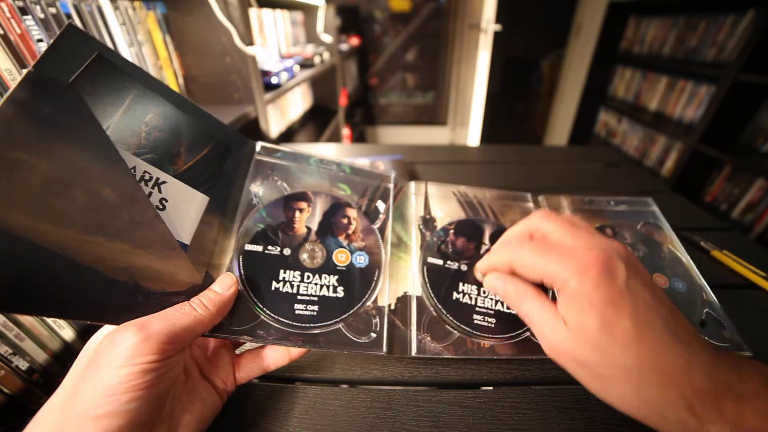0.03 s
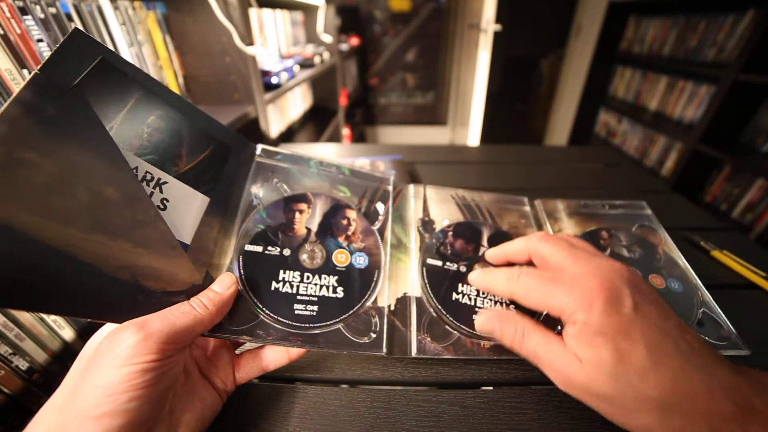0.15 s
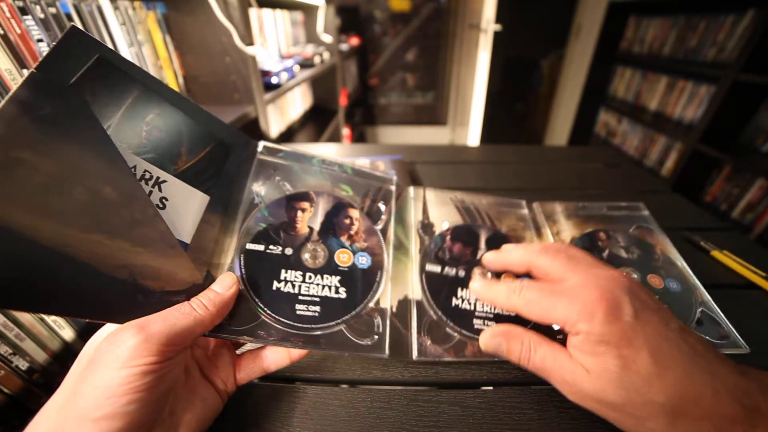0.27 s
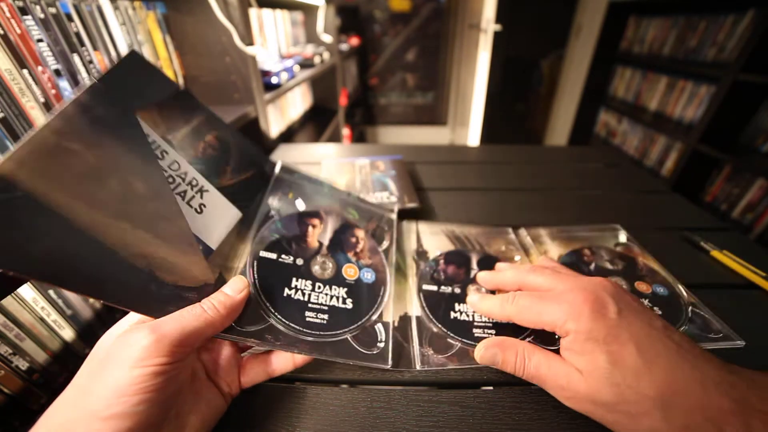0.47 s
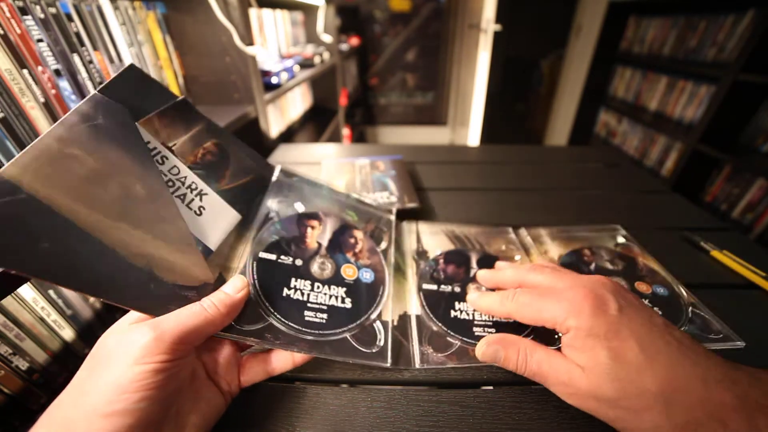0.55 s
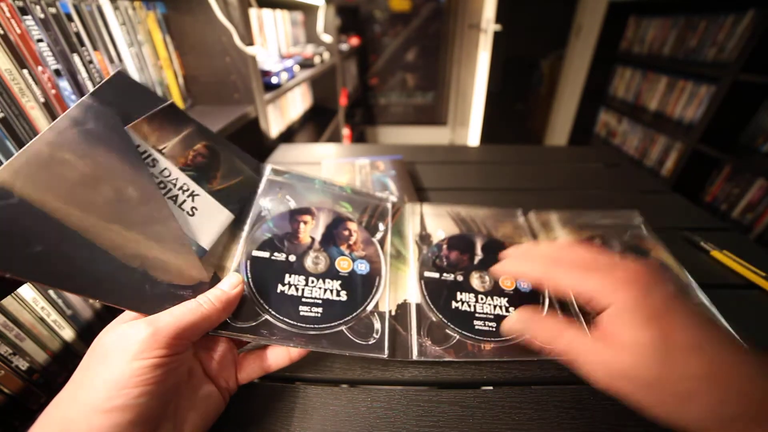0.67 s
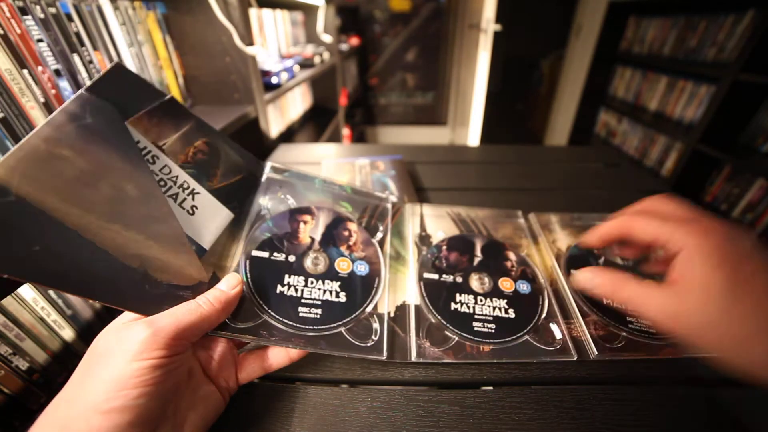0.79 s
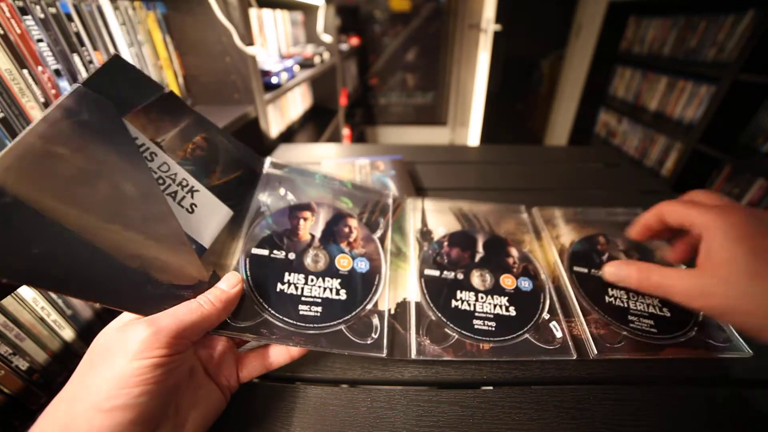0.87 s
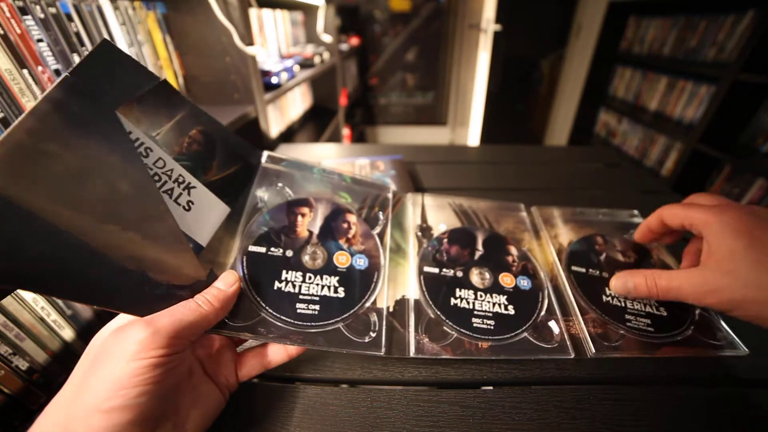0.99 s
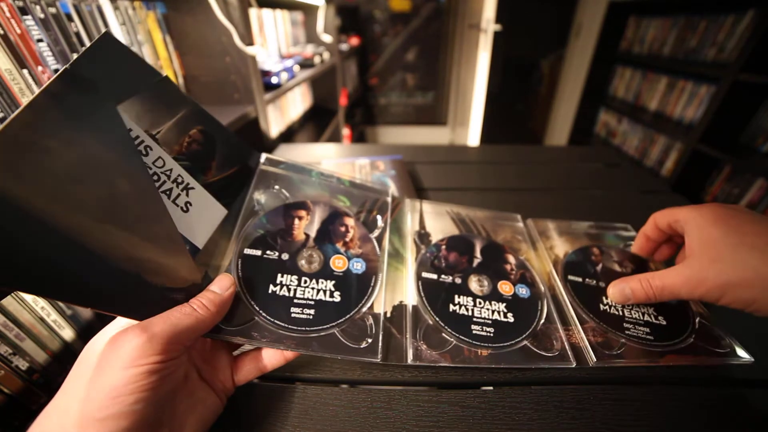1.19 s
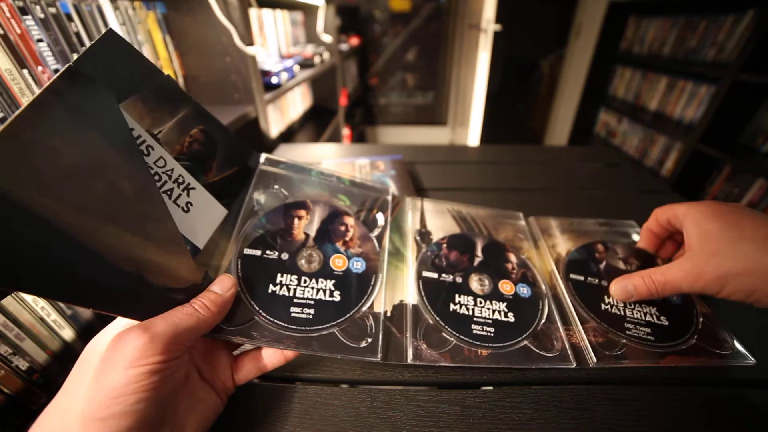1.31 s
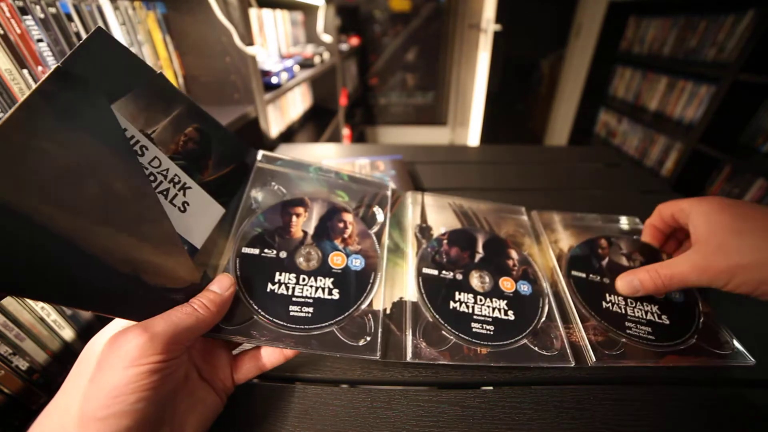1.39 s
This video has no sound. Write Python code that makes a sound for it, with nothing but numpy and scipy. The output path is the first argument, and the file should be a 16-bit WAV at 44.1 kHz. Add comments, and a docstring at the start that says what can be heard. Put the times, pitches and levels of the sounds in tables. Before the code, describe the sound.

A disc snaps sharply on the hub of a hard plastic tray. Fingers tap and slide over the case, a tray clacks down, and another disc clicks as it is pressed, close by in a small room.

```python
"""A disc snaps on its hub, the centre grip of a hard plastic tray, with a crack and a short ring.
The trays belong to a fold-out case that is handled on a table in a small room.
Fingers tap and slide over the plastic, a tray clacks down and another disc is pressed.
The blows ring the thin plastic and thump the case; the room adds a faint hush and a short echo."""
import sys
import numpy as np
from scipy import signal
from scipy.io import wavfile

SR = 44100
rng = np.random.default_rng(int(sys.argv[2]) if len(sys.argv) > 2 else 0)


def wav_record(signal):
    """Record a signal, one row per channel, as 16-bit PCM in the file named by sys.argv[1]."""
    frames = np.transpose(np.atleast_2d(signal))
    bounded = np.clip(frames, -1, 1)
    # unit amplitude maps onto the largest positive 16-bit level
    quanta = np.round(bounded * 32767).astype(np.int16)
    wavfile.write(sys.argv[1], SR, quanta)


N = 63945
T = np.arange(SR // 3) / SR  # time in seconds within one hit
TOUCH_S = 0.00062  # how quickly a hit builds up


def amp(db):
    return 10 ** (np.asarray(db) / 20)


def unit(x):
    return x / np.sqrt(np.mean(x ** 2) + 1e-20)


def value_at(points, hz):
    f, value = np.transpose(points)
    return np.interp(np.log(hz + 1), np.log(f + 1), value)


def add(mix, start, sound):
    part = mix[round(start * SR):][:len(sound)]
    part += sound[:len(part)]


def noise(n):
    return rng.choice([-1., 1.], n)


def die_away(fade):
    """A fall of 60 dB in `fade` seconds; every fade in the tables means this."""
    return 1e-3 ** (T / fade)


def low_cut(x, hz):
    return signal.sosfilt(signal.butter(2, hz, "high", fs=SR, output="sos"), x)


def colour(x, tone, tilt_db=0, edge_hz=SR):
    """Give x a tone (a balance of low and high), tilted per octave and dulled above an edge."""
    hz = np.fft.rfftfreq(4096, 1 / SR)
    gain = amp(value_at(tone, hz) + tilt_db * np.log2(np.maximum(hz, 300)))
    gain /= np.hypot(1, (hz / edge_hz) ** 2)
    log_gain = np.log(np.r_[gain, gain[-2:0:-1]])
    response = np.exp(np.conj(signal.hilbert(log_gain)))  # nothing sounds before its hit
    kernel = np.fft.ifft(response).real[:len(hz)]
    return signal.fftconvolve(x, kernel / np.linalg.norm(kernel))[:len(x)]


def burst(tone, fade, tilt_db=0, edge_hz=SR):
    """Countless close pitches that blur into noise and die together."""
    onset = 1 - np.exp(-T / TOUCH_S)
    return colour(noise(len(T)) * die_away(fade) * onset, tone, tilt_db, edge_hz)


def note(hz, db, fade):
    return amp(db) * die_away(fade) * np.sin(2 * np.pi * hz * T)


def ring(notes):
    """A struck part rings at its own pitches, neighbours swinging against each other."""
    onset = 1 - np.exp(-T / TOUCH_S)
    return onset * sum((-1) ** k * note(*row) for k, row in enumerate(notes))


def thump(notes):
    """A blow pushes all the low notes the same way; a small case gives off no deep bass."""
    return low_cut(sum(note(*row) for row in notes), hz=112)


# tone of the room's still air: f/Hz, level/dB
AIR_TONE = [(20, -23), (35, -1), (49, 9.5), (66, -6.5), (140, 1.5), (220, -5), (330, -5.5), (1000, -11),
            (3000, -11.5), (8000, -17.5), (12000, -22.5), (16000, -26)]
def air():
    """A faint, steady, low hush."""
    return amp(-63.5) * unit(colour(rng.standard_normal(N), AIR_TONE))


# how long each pitch lingers in the room: f/Hz, fade/s
ROOM_FADES = [(100, 0.25), (500, 0.43), (2000, 0.37), (6000, .25), (14000, 0.16)]
def room(x):
    """Sound bounces back from the shelves, then blurs into a short tail."""
    echo_s, spread_s = 0.015, 0.004
    hz, frame_s, bands = signal.stft(rng.standard_normal(SR // 2), SR, nperseg=256)
    bands = bands * 1e-3 ** (frame_s / value_at(ROOM_FADES, hz)[:, None])
    tail = signal.istft(bands, SR, nperseg=256)[1]
    t = np.arange(len(tail)) / SR
    tail *= np.minimum(t / echo_s, 1)
    early = noise(len(t)) * np.exp(-((t - echo_s) / spread_s) ** 2)
    echoes = amp(-19) * tail / np.linalg.norm(tail) + amp(-21.5) * early / np.linalg.norm(early)
    return signal.fftconvolve(x, echoes)[:N]


def friction(tone, tilt_db=0):
    """Tiny slips of uneven size, heard through the plastic."""
    slips_per_s = 6500
    slips = noise(N) * (rng.random(N) < slips_per_s / SR)
    sizes = amp(2.5 * np.minimum(rng.exponential(1, N), 4))
    return unit(colour(slips * sizes, tone, tilt_db))


# how loud the rubbing is over time: t/s, level/dB
RUB_LEVELS = [(0, -49.5), (.08, -57), (.12, -59.5), (.175, -63), (.235, -46.5), (.3, -48.5), (.37, -43),
              (.388, -50), (.41, -53), (.5, -67.5), (.525, -60), (.588, -56.5), (.62, -48.5), (.72, -69.5),
              (.82, -72), (.865, -57.5), (.955, -50.5), (.99, -47.5), (1.03, -59.5)]
# tone of the rubbing: f/Hz, level/dB
RUB_TONE = [(100, -15.5), (350, -16), (750, -3), (1150, -6.5), (2400, -1.5), (4300, -3.5), (7300, -2),
            (8800, -12), (10500, -16.5), (12500, -27.5), (16000, -35)]
def rubbing():
    """Skin and card slide over plastic as the case is handled."""
    db = np.interp(np.arange(N) / SR, *np.transpose(RUB_LEVELS), right=-65)
    return amp(db - 1) * friction(RUB_TONE)


# fingertip strokes: middle t/s, half length/s, level/dB, tilt/(dB per octave)
FINGER_STROKES = [(0.37, 0.024, -48, 5.5), (1.107, 0.039, -39, 1.5), (1.183, 0.021, -44.5, -1),
                  (1.253, 0.013, -56.5, -2.5), (1.314, 0.025, -41, -2.5), (1.363, 0.056, -53, -4)]
# tone of a stroke: f/Hz, level/dB
STROKE_TONE = [(100, -30), (400, -12), (1000, -8), (1500, -5.5), (2200, -1), (3000, -2.5), (5800, -0.5),
               (7800, -0.5), (9500, -12.5), (12000, -20.5), (14000, -35), (16000, -30.5)]
def strokes():
    """A fingertip swishes across a disc, each stroke swelling and fading."""
    t = np.arange(N) / SR
    return sum(amp(db) * np.exp(-((t - middle) / half) ** 2) * friction(STROKE_TONE, tilt_db)
               for middle, half, db, tilt_db in FINGER_STROKES)


# ticks of the hub's prongs: t/s, f/Hz, level/dB, fade/s
PRONG_TICKS = [(0.3433, 2395, -31, 0.021), (0.3662, 2960, -34, 0.023), (.6575, 6180, -42.5, .02),
               (.9638, 4020, -32.5, .022)]
def prongs():
    """The small teeth of the hub catch on a disc, each with its own pitch."""
    out = np.zeros(N)
    for start, hz, db, fade in PRONG_TICKS:
        add(out, start, ring([(hz, db, fade)]))
    return out


# low notes of the case: f/Hz, level/dB, fade/s
CASE_NOTES = [(102.3, -19, 0.072), (121, -23, 0.13), (155.9, -33.5, 0.48), (221, -30.5, 0.1),
              (348, -33.5, 0.056)]
def case_thump():
    """The whole case thumps on the table."""
    return thump(CASE_NOTES)


# notes of the cover: f/Hz, level/dB, fade/s
COVER_NOTES = [(270, -17, 0.027), (335, -11, 0.0505), (402.5, -19.5, 0.056), (460, -22, 0.059),
               (710, -17, 0.045)]
def cover_knock():
    """The card cover answers a blow with a hollow knock."""
    return thump(COVER_NOTES)


# finger taps: t/s, level/dB, fade/s, tilt/(dB per octave), upper edge f/Hz, thump/dB, knock/dB
FINGER_TAPS = [(0.106, -49, 0.066, 2.5, 9000, -1, -21), (0.2358, -46, 0.018, -4.5, 8000, -11, -16),
               (0.293, -39, 0.046, 3, 11800, -12, -20), (0.3141, -33.5, 0.018, 7.5, 12000, -16, -29),
               (.3222, -38, 0.012, 7, 12000, -17, -20), (.334, -34, 0.066, 1, 9000, 11.5, -16),
               (.3388, -35, 0.0096, 13, 16000, -20, -10), (0.3392, -31.5, 0.044, 1.5, 12000, -18, -18),
               (.356, -38.5, 0.031, 7, 12000, -4, 3), (0.3643, -43, 0.05, 15, 12000, 3, -12),
               (0.3895, -30, 0.027, 0, 6900, 1.5, 3), (.395, -40.5, 0.038, -6.5, 2500, -6, 2.5),
               (0.42, -42.5, 0.038, 4, 9100, 10, -3), (0.4252, -43, 0.03, 0.5, 9000, -7, -8),
               (0.4451, -43, 0.024, -0.5, 10000, 3, -11), (0.4531, -45, 0.021, 0, 10000, -2, 0),
               (.479, -49, 0.059, 0.5, 9000, 0, -18), (0.5748, -38.5, 0.014, 2.5, 6960, -1, -2),
               (0.5899, -37, 0.027, 1.5, 1360, -28, -15), (0.656, -41, 0.013, 3, 9200, -13, -19),
               (0.668, -53.5, 0.033, -7, 2494, -8, 1), (0.7399, -42, 0.063, 1.5, 8000, 12.5, -6),
               (0.7425, -48, 0.06, -4, 9000, 3, -20), (0.751, -43.5, 0.058, 1, 9000, 0, -21),
               (.767, -50, 0.069, 0, 9000, -2, -13)]
# tone of a tap: f/Hz, level/dB
TAP_TONE = [(80, -26), (300, -0.5), (1000, 0), (3000, 1.5), (5000, 1), (7300, 0.5), (9500, -11.5),
            (12000, -25), (16000, -44)]
def taps():
    """Light, short touches on the plastic: dull from a fingertip, bright from a nail."""
    out, case, cover = np.zeros(N), case_thump(), cover_knock()
    for start, db, fade, tilt_db, edge_hz, thump_db, knock_db in FINGER_TAPS:
        touch = burst(TAP_TONE, fade, tilt_db, edge_hz)
        add(out, start, amp(db) * (touch + amp(thump_db) * case + amp(knock_db) * cover))
    return out


# tone of a tray's first touch: f/Hz, level/dB
CLICK_TONE = [(500, -28), (3000, 4), (9500, 5), (11500, -13), (16000, -25)]
def click():
    """Hard edges meet: bright, abrupt and gone at once."""
    return amp(2) * colour(noise(len(T)) * die_away(0.012), CLICK_TONE)


def detune(notes, share=0.0064):
    """Nudge each pitch at random, as no two hits ring quite alike."""
    return [(hz * (1 + share * rng.standard_normal()), db, fade) for hz, db, fade in notes]


# tray clacks: t/s, level/dB, fade/s, tray ring/dB, disc ring/dB, thump/dB, knock/dB
TRAY_CLACKS = [(0.8702, -43, 0.049, -8, -15, -13, -15), (0.8735, -16.5, 0.029, 3, -28, -4, -28),
               (0.8793, -21, 0.062, -2, -6, -10, -20), (0.8833, -25, 0.045, -11, -23, -8, -21),
               (0.8955, -27.5, 0.025, -21, -7, -9, -8.5), (0.915, -36.5, 0.06, -12, -1, -9, -1.5),
               (0.9651, -40, 0.038, 2, -14, -24, -10), (0.978, -45, 0.054, -18, -15, -11, -13),
               (1.2784, -33.5, 0.037, -12, -8, 4, -13), (1.3, -43, 0.079, -11.5, -5, -13.5, -16),
               (1.3224, -31.5, 0.029, -14, 9.5, -8, -6.5), (1.3243, -25, 0.032, -29, 11, -5.5, -9.5),
               (1.3322, -32, 0.043, -16, 6, -1, -4.5)]
# notes of a tray: f/Hz, level/dB, fade/s
TRAY_NOTES = [(911, -26, 0.15), (1052, -24, 0.059), (3430, -18, 0.062), (3806, -13, 0.041),
              (4224, -13, 0.043), (4750, -15, .05), (6050, -6, 0.045), (6309, -4.5, 0.042),
              (7230, -14, 0.05), (7345, -6, 0.054), (7900, -12, 0.055), (9340, -14.5, 0.042)]
# notes of a disc sitting in its tray: f/Hz, level/dB, fade/s
DISC_NOTES = [(674, -20.5, 0.044), (766, -20.5, 0.029), (1793, -10, 0.033), (1945, -11.5, 0.024),
              (2226, -14, 0.025), (3800, -18, 0.046), (4410, -15, .025), (7364, -6, 0.018)]
# tone of the trays' clatter: f/Hz, level/dB
CLATTER_TONE = [(80, -16.5), (300, -16.5), (900, -3.5), (1500, -4), (3800, 3), (5200, -0.5), (7200, -1.5),
                (9600, -12), (11500, -18), (13500, -29), (16000, -31)]
def trays():
    """Trays land and chatter, shaking the discs in them and the cover under them."""
    click_growth = 1.58  # dB of click per dB of blow: only hard blows are crisp
    out, case, cover = np.zeros(N), case_thump(), cover_knock()
    for start, db, fade, tray_db, disc_db, thump_db, knock_db in TRAY_CLACKS:
        tray = amp(tray_db) * ring(detune(TRAY_NOTES))
        disc = amp(disc_db) * ring(detune(DISC_NOTES))
        body = amp(thump_db) * case + amp(knock_db) * cover
        clatter = amp(-0.5) * burst(CLATTER_TONE, fade)
        add(out, start, amp(db) * (clatter + tray + disc + body) + amp(click_growth * db) * click())
    return out


# the snap and its rebound: t/s, level/dB, fade of the crack/s
HUB_SNAPS = [(.2408, -4.3, .017), (.2439, -8, .024)]
# tone of the crack: f/Hz, level/dB
CRACK_TONE = [(50, -19), (250, -8), (560, -10.5), (770, -5), (1100, -11), (1600, -5), (3500, -2), (6500, 4),
              (9300, -2), (10500, -14.5), (12000, -16), (13500, -34.5), (16000, -31)]
# notes of the disc on its hub: f/Hz, level/dB, fade/s
HUB_NOTES = [(240, -32, 0.035), (400, -27.5, .04), (1356, -23.5, 0.05), (2225, -19.5, .03),
             (2353, -17.5, 0.033), (2924, -19, 0.05), (4164, -19, 0.023), (8600, -16.5, .02),
             (9250, -20, 0.023)]
# notes that beam straight out from the disc's face: f/Hz, level/dB, fade/s
FACE_NOTES = [(712, -16, .036), (885, -24, .03), (5750, -15, .03), (5890, -12, .035), (6122, -7, .03),
              (6560, -2, .021), (6782, -8, .027), (7060, -14, .024)]
def hub_snap():
    """The hub lets go: a crack, a ringing disc and a thump. The face's ring is returned separately."""
    snap, face = np.zeros(N), np.zeros(N)
    for start, db, fade in HUB_SNAPS:
        crack = amp(-1) * burst(CRACK_TONE, fade)
        body = amp(-1.5) * ring(HUB_NOTES) + amp(-19.5) * case_thump()
        add(snap, start, amp(db) * (crack + body))
        add(face, start, amp(db - 1) * ring(FACE_NOTES))
    return snap, face


def scene():
    """All the sounds in one channel; little of the face's beamed ring goes into the echo."""
    snap, face = hub_snap()
    handling = trays() + taps() + prongs() + rubbing() + strokes()
    hush = air()
    echo = room(amp(-3.5) * snap + amp(-12) * face + handling)
    return (snap + face + handling + echo + hush)[None]


def record(dry):
    """The microphone sheds deep bass, peaks stop at full scale and the highest treble is cut."""
    limited = np.clip(low_cut(dry, hz=27), -1, 1)
    treble_cut = signal.firwin(511, 16300, window=("kaiser", 9), fs=SR)
    return signal.oaconvolve(limited, treble_cut[None], "same")


dry = scene()
out = record(dry)
wav_record(out)
```